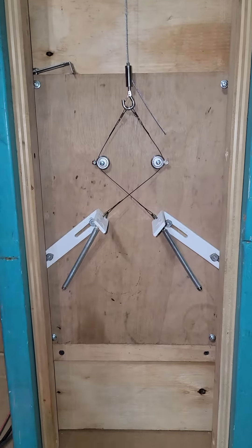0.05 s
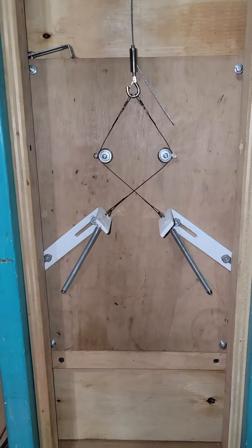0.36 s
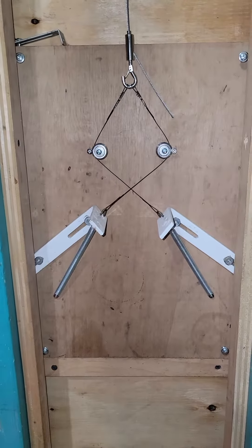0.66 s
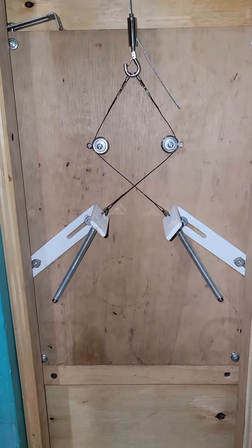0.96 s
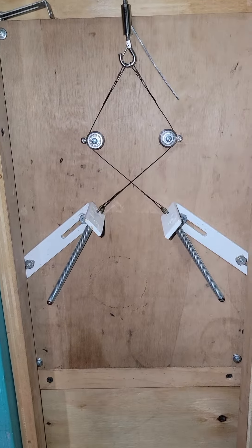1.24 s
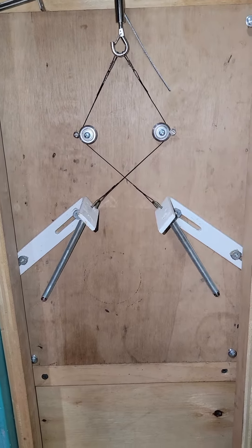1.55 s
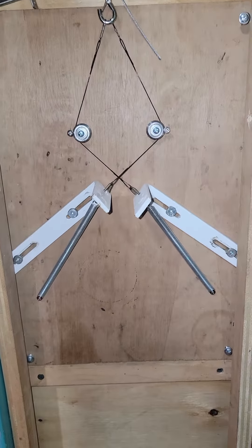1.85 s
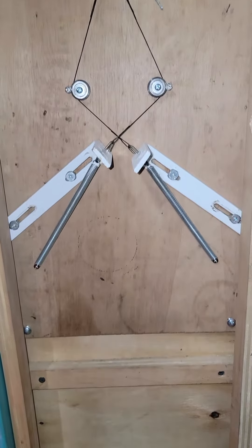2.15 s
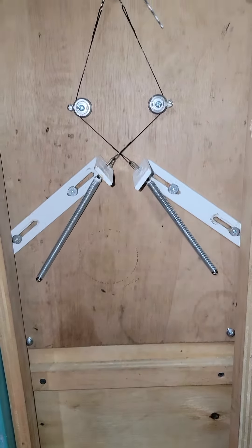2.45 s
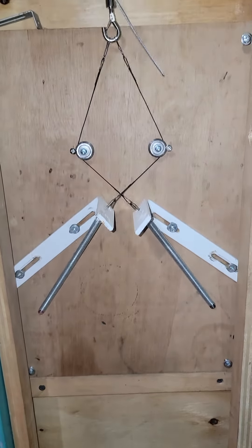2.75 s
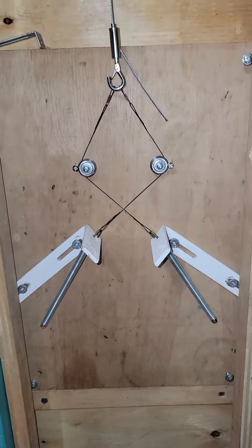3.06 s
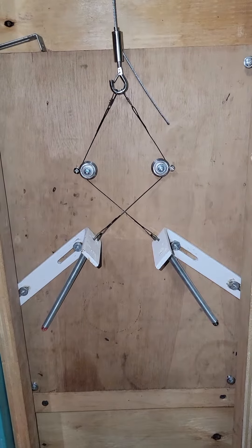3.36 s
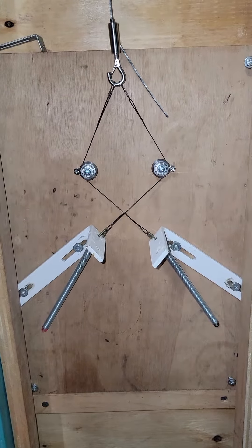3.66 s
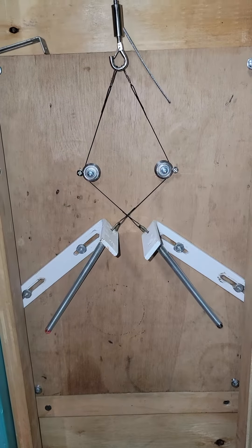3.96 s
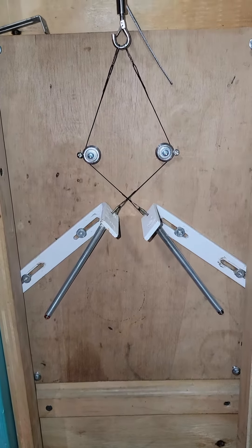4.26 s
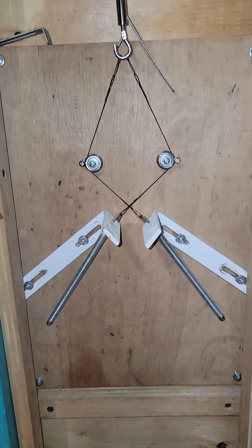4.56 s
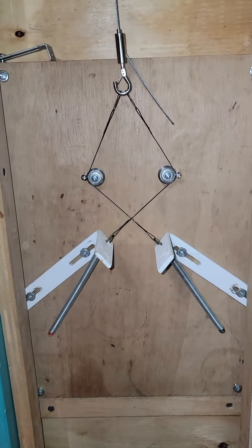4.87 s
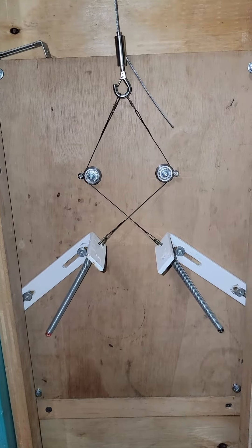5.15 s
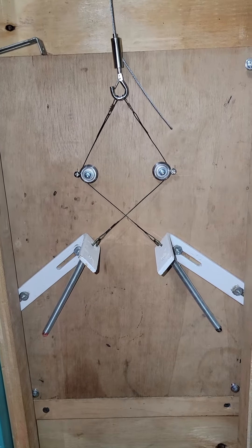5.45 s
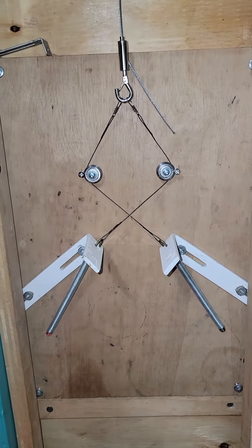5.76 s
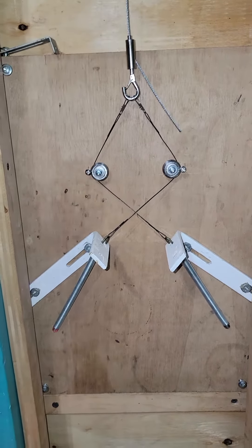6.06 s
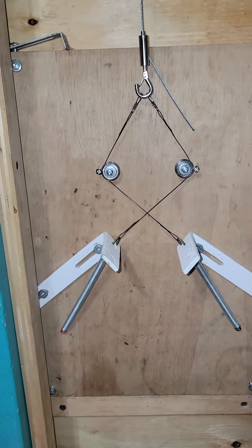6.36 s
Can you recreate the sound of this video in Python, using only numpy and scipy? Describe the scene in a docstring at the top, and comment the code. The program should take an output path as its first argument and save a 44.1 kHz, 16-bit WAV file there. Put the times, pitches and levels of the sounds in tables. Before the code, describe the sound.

A wooden coop door is pulled up and dropped twice, its latch bars clacking and scraping, landing with booming thuds over a low hum.

```python
"""A plywood coop door, pulled up by a cord and let down twice, close to a two-port stereo microphone.
Spring-loaded latch bars scrape and clack, the panel rubs and shudders in its wooden rails, and each time
it lands hard and booms, shaking its springs and hook. Faint handling rustles come at the start and end.
The room has a short tail, and a low steady hum lies behind everything."""
import sys
import numpy as np
from scipy import signal
from scipy.fft import rfft, irfft, next_fast_len
from scipy.io import wavfile

SR = 44100
rng = np.random.default_rng(int(sys.argv[2]) if len(sys.argv) > 2 else 0)


def unload_audio(sound):
    """Save the sound as a 16-bit wav file, at the path given as the first command line argument."""
    columns = np.transpose(np.atleast_2d(sound))
    # keep every value between -1 and 1, then stretch to whole-number steps
    steps = np.round(np.clip(columns, -1, 1) * 32767)
    wavfile.write(sys.argv[1], SR, steps.astype(np.int16))


N = 291581

# the door hits its sill: t/s, level/dB, edge near 3.5 kHz/dB, fizz above 8 kHz/dB, springs/dB, hook/dB
LANDINGS = [(2.702, -8, -6, -28.5, -47, -64), (4.669, -7, 1.5, -6, -43, -44)]
# upper modes of the plywood, rung by sharp contacts: f/Hz, level/dB, t60/s
BOARD_MODES = [(410.3, -9.5, 0.21), (517, -2, 0.16), (580, -2.5, 0.15), (624.6, -5, 0.12),
               (693, -4.5, 0.22), (784, 4, 0.061), (878, -7.5, 0.14), (986, 6.5, 0.044), (1139, 3.5, 0.044),
               (1244, 1, 0.05), (1410, -7.5, 0.049), (1587, -8.5, 0.098), (1836, -12, 0.1),
               (2460, -24, 0.075)]
# modes of a latch bar: f/Hz, level/dB, t60/s
LATCH_MODES = [(1437, 7.5, 0.014), (1744, -17, 0.019), (2740, -26, 0.043), (3050, -12, 0.034),
               (3450, -9.5, 0.033), (4206, -22, 0.034)]
# how alike diffuse sound is at the two ports: f/Hz, coherence/0..1
PORT_COHERENCE = [(150, 0.96), (300, 0.85), (600, 0.9), (1400, 0.22), (3000, 0.027), (8000, 0.25)]


def landings(build_s=0.019):
    """The door lands corners first; the hook rattles and the shock builds up in the chattering springs."""
    # dull touches of the corners: t before the blow/s, drop below the blow/dB
    corners = [(0.0098, 5), (0.004155, 2)]
    # the hook bounces in its loop: t after the blow/s, level/dB
    hook_bounces = [(0.001, 0.5), (0.0035, -4.5), (0.0085, -6), (0.019, -14)]
    # modes of the steel hook: f/Hz, level/dB, t60/s
    hook_modes = [(8660, 8, 0.045), (8740, 0, .03), (11000, 1.5, 0.053), (11800, -5, 0.055),
                  (12700, -2.5, 0.06), (13990, 4, 0.04), (14000, 4, .035), (14400, -1, .025)]
    # spring modes, the low ones mostly slower along the coils: f/Hz, level/dB, t60/s, arrival/s
    spring_modes = [(2310, -6, 0.16, 0.01), (2900, -10, .19, 0.02), (3260, -2, 0.23, 0.028),
                    (3530, -8, 0.12, 0.012), (4020, -7, 0.16, 0.01), (4150, -8, 0.17, 0.0053),
                    (4500, 8, 0.11, 0.0073), (4450, -4.5, 0.11, 0.0062), (4510, 1, 0.16, 0.009),
                    (4630, 4, 0.09, 0.008), (4830, -11, 0.11, 0.006), (5270, -10, 0.1, 0.0036)]
    out = np.zeros((2, N))
    for s, db, edge_db, fizz_db, spring_db, hook_db in LANDINGS:
        for ahead, below_db in corners:
            add(out, *contact(s - ahead, db - below_db, edge_db=-16, fizz_db=-21))
        add(out, *contact(s, db, edge_db, fizz_db))
        for delay, bounce_db in hook_bounces:
            add(out, s + delay, amp(hook_db + bounce_db) * ring(hook_modes, detune=0.004))
        for hz, level, t60, arrival in spring_modes:
            fed = np.exp(np.log(1000) * build_s / t60)  # the coils are fed while they build up
            coil = ring([(hz, level, t60)], detune=0.0016, attack_s=build_s)
            chatter = unsteady(coil.shape[1], depth_db=3, span_s=0.003)
            add(out, s + arrival, fed * amp(spring_db) * coil * chatter)
    return out


def booms(delay_s=0.00984, build_s=0.011, boom_db=3.5, slap_db=-19, tuning=1.005, sag_per_s=0.24):
    """After a landing the panel's low modes swell, beat and sag in pitch; every swing slaps the rails."""
    # low modes of the plywood panel: f/Hz, level/dB, t60/s
    panel_modes = [(79.8, -23.5, 0.84), (193, -19.5, 0.071), (228.4, -17.5, 0.091), (265.6, -15, 0.24),
                   (287, -2.5, 0.17), (309, -19.5, 0.15)]
    # colour of the panel against its rails: f/Hz, level/dB
    slap_colour = [(280, -2), (450, 8), (1000, -10.5), (2000, -4)]
    seated_s, seated_db_per_s = 0.077, 330  # extra damping once the door sits on its sill
    out, t = np.zeros((2, N)), np.arange(26000) / SR - .1
    age = np.maximum(t, 0)
    rise = np.exp(-(np.minimum(t, 0) / build_s) ** 2)
    damping = amp(-seated_db_per_s * np.maximum(t - seated_s, 0))
    sagging = tuning * (t - sag_per_s * age ** 2 / 2)
    modes = sum(amp(level) * np.cos(2 * np.pi * hz * sagging) * decay(age, t60)
                for hz, level, t60 in panel_modes)
    swing = rise * damping * modes
    for s, db, *_ in LANDINGS:
        buzz = np.maximum(swing, 0) * grains(len(t))
        slaps = coloured(wooden(buzz, edge_db=-12, fizz_db=-24), slap_colour)
        add(out, s + delay_s + t[0], amp(db + boom_db) * (swing + amp(slap_db) * slaps))
    return out


def clacks(rebound_s=0.00535, rebound_db=-5.5, dull_db=-4.5, latch_db=-6, ring_per_edge=0.58):
    """A latch bar hits the wood and rebounds softer and duller; the harder its edge, the more it rings."""
    # strikes of the bars: t/s, level/dB, edge/dB, fizz/dB
    strikes = [(1.058, -46, -19, -11), (1.094, -31, -1, -4), (1.1075, -31.5, -8, -14),
               (1.128, -36, -10, -13), (1.564, -18.5, -5.5, -17), (1.654, -33, -19, -22),
               (1.663, -31, -6, -21), (1.696, -31, -9, -8), (1.7071, -25, -7, -10), (1.7365, -32.5, -5, -6),
               (2.8027, -35, -11, -16), (2.8475, -22, -0.5, -4), (2.887, -25, 1, -3),
               (2.896, -20.5, -5, -3), (2.9147, -17.5, -11.5, -4), (3.551, -18, 4.5, -2),
               (3.8319, -37.5, 8, -16), (4.076, -28, -3, -14), (4.1077, -24, 5.5, -17),
               (4.805, -29.5, -6, -3), (4.814, -26, -2, -10)]
    out = np.zeros((2, N))
    for s, db, edge_db, fizz_db in strikes:
        add(out, *contact(s, db, edge_db, fizz_db))
        add(out, *contact(s + rebound_s, db + rebound_db, edge_db + dull_db, fizz_db + dull_db))
        add(out, s, amp(db + latch_db + ring_per_edge * edge_db) * ring(LATCH_MODES, detune=0.019))
    return out


def clinks():
    """The hardest clacks ring brief notes in the hardware, quickly damped by the wood."""
    # notes of steel or wood: t/s, f/Hz, level/dB, t60/s
    notes = [(1.564, 3070, -30, 0.03), (1.7065, 1070, -25.5, 0.018), (2.848, 1750, -27, 0.017),
             (2.9152, 904, -15, 0.016), (3.5512, 2900, -25, 0.033), (3.552, 6900, -19.5, 0.0079),
             (3.552, 3140, -28, 0.04), (3.552, 1860, -32, 0.12), (4.108, 1845, -23.5, 0.038),
             (4.108, 1305, -18, 0.02)]
    out = np.zeros((2, N))
    for s, hz, db, t60 in notes:
        add(out, s, amp(db) * ring([(hz, 0, t60)]))
    return out


def scrapes(steel_fade_db=7, size=32768):
    """A latch bar slides along its slot, swelling or easing as it passes from steel to wood."""
    # strokes: t/s, length/s, wood/dB, steel/dB, swell over the stroke/dB, sparkle above 11 kHz/dB
    slides = [(0.927, 0.031, -49.5, -66, -3, 0), (1.03, 0.022, -43, -48.5, 6, 4),
              (1.052, 0.045, -37, -41.5, 8, 7.5), (1.104, 0.06, -39, -46.5, -2.5, 2),
              (1.582, 0.031, -44.5, -74, -1, -2), (1.655, 0.057, -35, -63, 7, 0),
              (1.719, 0.09, -38, -60, -2, 5), (1.995, 0.028, -43, -62, -4, 2),
              (2.074, 0.011, -49, -36, 5.5, -1), (2.812, 0.031, -34, -48, 4.5, 8),
              (2.847, 0.045, -31.5, -44, 9.5, 4), (2.918, 0.026, -38.5, -51, -3.5, -7),
              (3.559, 0.042, -35.5, -58, -14, 0), (3.645, 0.018, -42.5, -63, -2.5, 0),
              (3.794, 0.015, -42, -65, 4, 0), (3.834, 0.035, -35, -60.5, 2.5, 4),
              (4.222, 0.026, -51.5, -76, -2, 0), (4.779, 0.054, -36.5, -53.5, 2, 2)]
    # a light stroke hardly moves the panel: f/Hz, gain/dB
    bass_cut = [(250, -3), (450, -1.5), (900, 0.5)]
    out, t = np.zeros((2, N)), (np.arange(size) - size // 2) / SR
    for s, length, wood_db, steel_db, swell_db, sparkle_db in slides:
        travel = np.clip(t / length, 0, 1) - .5
        wood = coloured(wooden(grains(size), edge_db=-9, fizz_db=-11), bass_cut)
        steel = coloured(steely(grains(size)), [(9000, 0), (11500, sparkle_db)])
        rub = amp(wood_db) * wood + amp(steel_db - steel_fade_db * travel) * steel
        add(out, s + t[0], amp(swell_db * travel) * stroke(t, length) * rub)
    return out


def squeaks(size=16384):
    """Friction drives a few resonances of dry steel, which glide as the contact point moves."""
    # rough squeaks: t/s, length/s, f/Hz, level/dB, glide/share of the pitch
    slips = [(1.054, 0.0069, 3170, -41, -0.0016), (1.075, 0.0184, 3220, -37, -0.05),
             (2.071, 0.02, 1960, -40, -0.31), (2.073, 0.01, 4260, -45.5, -0.048),
             (2.818, 0.0079, 4230, -52, -0.023), (2.887, 0.015, 1160, -30.5, 0.019),
             (3.648, 0.0069, 1210, -47, -0.066)]
    # resonances of a squeak: ratio to its pitch, width/Hz, level/dB
    modes = [(1, 184, -3), (1.11, 150, -5), (1.51, 250, -22)]
    out, t = np.zeros((2, N)), (np.arange(size) - size // 2) / SR
    for s, length, hz, db, glide in slips:
        peaks = sum(amp(level) * peak(bins(t), hz * ratio, width / 2) for ratio, width, level in modes)
        held = irfft(rfft(grains(size)) * peaks, size)
        shift_hz = hz * glide * np.clip(t / length, 0, 1)
        gliding = (signal.hilbert(held) * np.exp(2j * np.pi * np.cumsum(shift_hz) / SR)).real
        add(out, s + t[0], amp(db) * stroke(t, length) * evened(gliding))
    return out


def shudders(size=16384):
    """Stick and slip in the rails drive the panel near its main resonance, at an unsteady pitch."""
    # short groans: t/s, length/s, f/Hz, level/dB
    groans = [(1.029, 0.0041, 310, -32), (1.059, 0.039, 370, -33.5), (1.132, 0.0085, 328, -26),
              (1.153, 0.012, 410, -44), (1.569, 0.0074, 318, -30.5), (1.813, 0.016, 298, -26),
              (1.999, 0.02, 282, -32), (2.093, 0.014, 365, -34), (2.416, 0.045, 295, -38),
              (2.522, 0.037, 300, -40), (2.594, 0.016, 295, -36), (2.617, 0.02, 290, -30),
              (3.561, 0.006, 290, -34), (3.721, 0.0088, 290, -40.5), (3.865, 0.015, 296, -27),
              (3.913, 0.02, 280, -35), (3.953, 0.035, 285, -47), (4.084, 0.011, 300, -36),
              (4.205, 0.052, 270, -47)]
    # harmonics of a groan: multiple, level/dB
    harmonics = [(1, -2), (2, -18), (3, -32)]
    out, t = np.zeros((2, N)), (np.arange(size) - size // 2) / SR
    for s, length, hz, db in groans:
        turns = np.cumsum(hz * unsteady(size, depth_db=0.3, span_s=0.00794)) / SR
        groan = sum(amp(level) * np.sin(2 * np.pi * (k * turns + rng.random())) for k, level in harmonics)
        add(out, s + t[0], amp(db) * stroke(t, length) * groan)
    return out


def rails():
    """The panel rubs softly along its wooden rails as it rises and sinks."""
    # strength of the rubbing, one curve for each lift: t/s, level/dB
    lifts = [
        [(1.62, -62), (1.85, -47.5), (2.13, -47.5), (2.28, -59.5), (2.5, -47), (2.68, -47), (2.78, -46)],
        [(3.57, -62), (3.95, -62), (4.25, -55), (4.42, -64.5), (4.62, -48), (4.75, -44)],
    ]
    t = np.arange(N) / SR
    pressure = sum(amp(np.interp(t, *np.transpose(lift), left=-np.inf, right=-np.inf)) for lift in lifts)
    waver = unsteady(N, depth_db=0.5, span_s=0.0082)
    rub = wooden(grains(next_fast_len(N)), edge_db=3, fizz_db=-4)[:, :N]
    return pressure * waver * rub


def ticks(edge_db=11):
    """Small bright contacts as the cord's tension shifts."""
    # touches of cord, pulleys and springs: t/s, level/dB, fizz/dB
    touches = [(1.82, -37, -23), (1.8393, -38.5, -7), (1.858, -37, -8), (1.9122, -37, 1),
               (2.675, -48.5, 10), (2.738, -50.5, 11.5), (2.794, -49, 9), (2.818, -51, 18),
               (3.628, -38.5, -5), (4.564, -49, 3), (5.648, -41, -11)]
    out = np.zeros((2, N))
    for s, db, fizz_db in touches:
        add(out, *contact(s, db, edge_db, fizz_db))
    return out


def rustles():
    """Handling near the microphone: faint, uneven swells of rubbing."""
    # swells: t of the crest/s, half-length/s, swish/dB, hiss/dB
    swells = [(0.077, 0.04, -56.5, -89), (0.12, 0.16, -62, -73.5), (0.584, 0.24, -74, -67.5),
              (6.387, 0.2, -81, -68)]
    # colour of the swish: f/Hz, level/dB
    swish_colour = [(900, -13), (2000, -6.5), (2900, 0), (3700, -2.5), (5000, -13), (6500, -25),
                    (15000, -40)]
    # colour of the high hiss: f/Hz, level/dB
    hiss_colour = [(3000, -5), (5500, 5), (9000, -2.5), (13000, 3), (16000, 1)]
    t, size = np.arange(N) / SR, next_fast_len(N)
    swish = evened(coloured(grains(size), swish_colour))[:, :N]
    hiss = evened(coloured(grains(size), hiss_colour))[:, :N]
    rubbing = sum(np.exp(-((t - s) / half) ** 2) * (amp(swish_db) * swish + amp(hiss_db) * hiss)
                  for s, half, swish_db, hiss_db in swells)
    return rubbing * unsteady(N, depth_db=2.0, span_s=0.089)


def room(x, onset_s=0.0088, size=20000):
    """A short dense tail from the coop and the walls around it."""
    # reverberation time: f/Hz, t60/s
    tail_t60s = [(200, 0.27), (1000, 0.12), (4000, 0.2), (12000, 0.21)]
    # strength of the reflections: f/Hz, gain/dB
    send = [(100, -3.5), (300, -10), (900, -8.5), (2000, -8.5), (4000, -9), (10000, -20.5)]
    rise = 1 - np.exp(-np.arange(size) / SR / onset_s)
    tail = dying(diffuse(rng.standard_normal((2, size))), tail_t60s) * rise
    tail /= np.linalg.norm(tail[0])
    return signal.fftconvolve(coloured(x, send), tail, axes=1)[:, :N]


def hum(level_db=-44.5):
    """Room tone: a steady low drone under a faint hiss of air."""
    # colour of hum and air: f/Hz, level/dB
    room_tone = [(20, -20), (33, -16.5), (46, 1.5), (62, -1.5), (82, -3), (115, -3), (150, -14.5),
                 (220, -24.5), (330, -18.5), (600, -21.5), (1100, -29.5), (2100, -37), (3400, -35),
                 (3900, -37.5), (4300, -35), (5000, -42.5), (6200, -53), (9000, -59), (15000, -54)]
    noise = diffuse(rng.standard_normal((2, next_fast_len(N))))
    return amp(level_db) * evened(coloured(noise, room_tone))[:, :N]


def contact(s, db, edge_db, fizz_db, board_db=-16, attack_s=0.00074, size=4096):
    """A short crack that leaves the board ringing; returns (start/s, sound)."""
    # decay of the crack itself: f/Hz, t60/s
    crack_t60s = [(200, 0.023), (1000, 0.031), (3500, 0.037), (9000, 0.042)]
    noise = evened(rng.standard_normal(size) + diffuse(rng.standard_normal((2, size))))
    crack = dying(noise, crack_t60s) * (1 - np.exp(-np.arange(size) / SR / attack_s))
    lead_in = ((0, 0), (size, 0))  # space for the wood filter to spread into
    sound = np.pad(amp(board_db) * ring(BOARD_MODES, detune=0.0031), lead_in)
    add(sound, 0, wooden(np.pad(crack, lead_in), edge_db, fizz_db))
    return s - size / SR, amp(db) * sound


def wooden(x, edge_db, fizz_db, resonance_db=5):
    """Wood colour with the board's resonances; harder, more metallic contact adds edge and fizz."""
    # colour of wood contacts: f/Hz, level/dB
    wood_colour = [(25, -28), (70, -3), (190, 3), (280, 14), (450, -0.5), (750, 0.5), (1350, -3.5),
                   (1900, -5.5), (2500, -9.5), (3200, -9), (4700, -16.5), (6400, -22.5), (8300, -22),
                   (10000, -22), (14500, -24.5)]
    hz = bins(x)
    peaks = sum(peak(hz, mode, half_width_hz=22) for mode, _, _ in BOARD_MODES)
    wood = evened(amp(read(wood_colour, hz) + resonance_db * peaks))
    hardness = [(1300, 0.009), (2800, edge_db), (4800, edge_db), (8000, fizz_db), (14500, 1.64 * fizz_db)]
    return irfft(rfft(x) * wood * amp(read(hardness, hz)), x.shape[-1])


def steely(x, resonance_db=7):
    """Steel colour with the latch bar's resonances."""
    # colour of rubbing steel: f/Hz, level/dB
    steel_colour = [(150, 0), (370, 13), (600, 9.5), (1100, -30), (1800, 4), (2500, 4), (3200, 1.5),
                    (4700, 4.5), (6400, -6.5), (8300, -10.5), (10000, -17.5), (14500, -12)]
    hz = bins(x)
    peaks = sum(peak(hz, mode, half_width_hz=35) for mode, _, _ in LATCH_MODES)
    steel = evened(amp(read(steel_colour, hz) + resonance_db * peaks))
    return irfft(rfft(x) * steel, x.shape[-1])


def ring(modes, detune=0, attack_s=0.00079, size=16384):
    """Damped sines, the high ones with their own phase at each port; shifting contacts detune them."""
    t, out = np.arange(size) / SR, np.zeros((2, size))
    for hz, db, t60 in modes:
        apart = 1 - read(PORT_COHERENCE, hz)
        pitch = hz * (1 + detune * rng.uniform(-1, 1))
        turns = pitch * t + rng.random() + apart * rng.random((2, 1))
        out += amp(db) * decay(t, t60) * np.sin(2 * np.pi * turns)
    return out * (1 - np.exp(-(t / attack_s) ** 2))


def grains(size, snags_per_s=1000, snag_db=4, smooth=0.49):
    """Friction: fibres snag and let go in a dense stream."""
    snagged = rng.random(size) < snags_per_s / SR
    strength = amp(snag_db * np.minimum(rng.exponential(1, size), 3))
    return evened(diffuse((snagged * strength + smooth) * rng.standard_normal((2, size))))


def stroke(t, length, grip_s=0.0038, release_s=0.012):
    """Pressure of a sliding contact: it grips, judders while it holds, and lets go."""
    judder = unsteady(len(t), depth_db=2, span_s=0.0034)
    return judder * np.exp(np.minimum(t, 0) / grip_s - np.maximum(t - length, 0) / release_s)


def unsteady(size, depth_db, span_s):
    """A factor that wanders at random, with a new value every span_s."""
    steps = np.arange(size) / SR / span_s
    return amp(depth_db * np.interp(steps, np.arange(8192), rng.standard_normal(8192)))


def diffuse(pair):
    """Makes two unrelated signals alike in the bass, as two nearby ports hear them."""
    a, b = rfft(pair)
    same = read(PORT_COHERENCE, bins(pair))
    return irfft(np.array([a, same * a + np.sqrt(1 - same ** 2) * b]), pair.shape[-1])


def dying(x, t60s):
    """Splits x into octave bands and lets each die at its own speed."""
    t, centres = np.arange(x.shape[-1]) / SR, np.geomspace(100, 12800, 8)
    spectrum = rfft(x)
    bands = (irfft(spectrum * read(np.c_[centres, share], bins(x)), len(t)) for share in np.eye(8))
    return sum(band * decay(t, read(t60s, hz)) for hz, band in zip(centres, bands))


def decay(t, t60):
    """Falls by 60 dB in t60 seconds."""
    return np.exp(-np.log(1000) * t / t60)


def peak(hz, centre_hz, half_width_hz):
    """A resonance curve of height 1."""
    return 1 / (1 + ((hz - centre_hz) / half_width_hz) ** 2)


def coloured(x, points):
    """Filters x by a table of f/Hz, gain/dB."""
    return irfft(rfft(x) * amp(read(points, bins(x))), x.shape[-1])


def read(points, hz):
    """Reads a table on a log-frequency axis."""
    f, value = np.transpose(points)
    return np.interp(np.log(hz + 1), np.log(f + 1), value)


def bins(x):
    """Frequencies of the spectrum of x."""
    return np.fft.rfftfreq(x.shape[-1], 1 / SR)


def amp(db):
    """Decibels to gain."""
    return 10 ** (np.asarray(db) / 20)


def evened(x):
    """Scales to rms 1."""
    return x / np.sqrt(np.mean(x ** 2) + 1e-20)


def add(mix, s, sound):
    """Mixes a sound in at time s."""
    part = mix[:, max(round(s * SR), 0):][:, :sound.shape[-1]]
    part += sound[..., :part.shape[-1]]


def scene():
    """The door up close, its contacts with their room tail, then handling and room tone."""
    contacts = landings() + clacks() + ticks() + scrapes() + squeaks() + clinks() + rails() + shudders()
    return contacts + room(contacts) + booms() + rustles() + hum()


def record(dry, ceiling=0.97, cutoff_hz=16000):
    """The left port hears first and each port has its own colour; peaks round off and the top is cut."""
    # balance of the ports: f/Hz, left minus right/dB
    balance = [(100, -1.8), (400, -0.5), (900, 0), (1700, -0.5), (4400, -3.5), (6300, 6.5), (8600, 7),
               (10000, 8), (11000, -9.5), (12500, 8.5), (14500, 1.5)]
    # phase by which the left port leads: f/Hz, lead/rad
    phase_lead = [(0, 0.42), (80, 0.22), (290, 0.62), (520, 1.946), (800, 2.42), (1300, 3.73), (2500, 8.0),
                  (16000, 35.3)]
    hz = bins(dry)
    lead = np.interp(hz, *np.transpose(phase_lead))
    left = amp(read(balance, hz) / 2) * np.exp(.5j * lead)
    ports = irfft(rfft(dry) * np.array([left, 1 / left]), N)
    rounded = ports / (1 + (ports / ceiling) ** 12) ** (1 / 12)
    lowpass = signal.firwin(511, cutoff_hz, window=("kaiser", 9), fs=SR)
    return signal.oaconvolve(rounded, lowpass[None], "same")


dry = scene()
out = record(dry)
unload_audio(out)
```